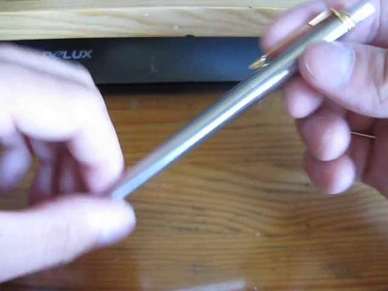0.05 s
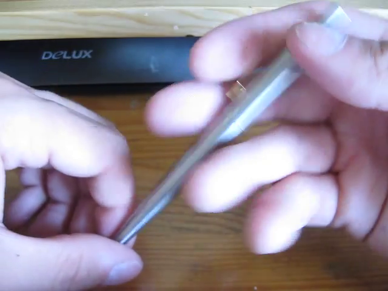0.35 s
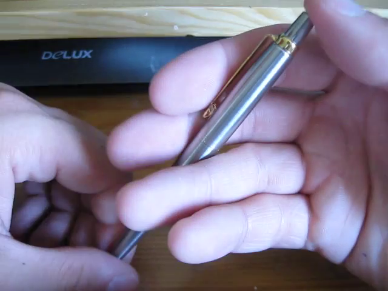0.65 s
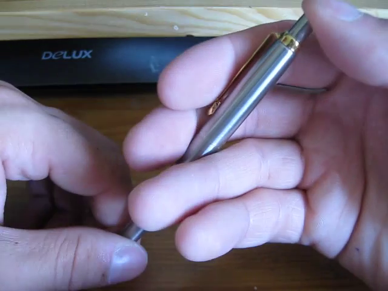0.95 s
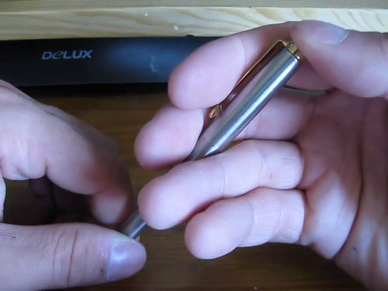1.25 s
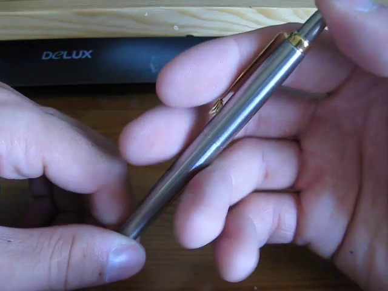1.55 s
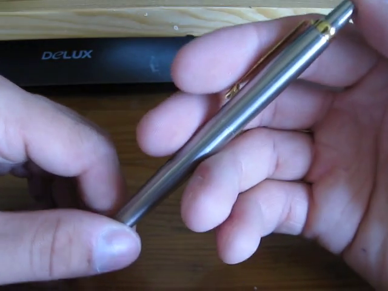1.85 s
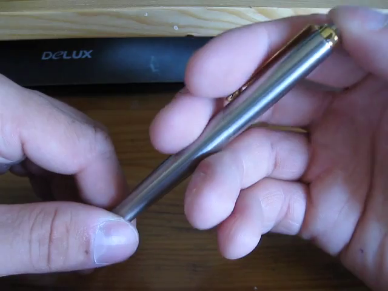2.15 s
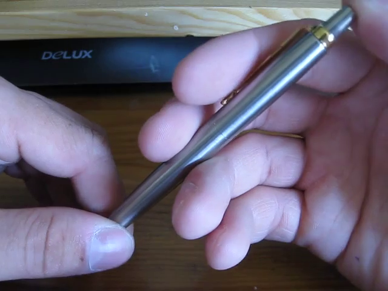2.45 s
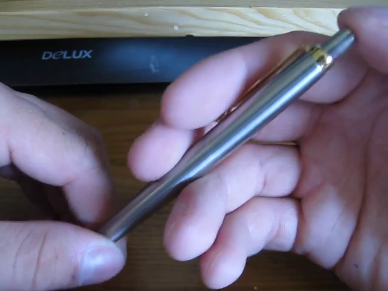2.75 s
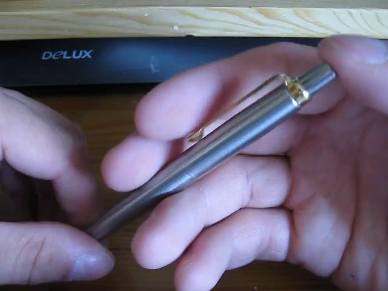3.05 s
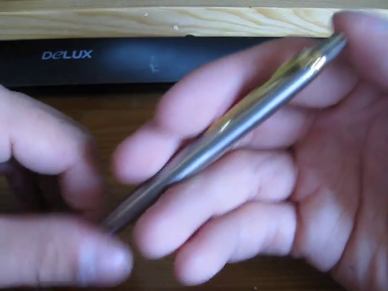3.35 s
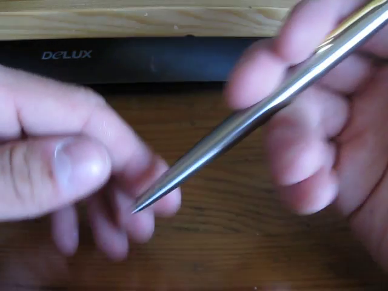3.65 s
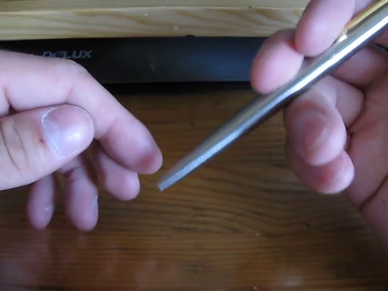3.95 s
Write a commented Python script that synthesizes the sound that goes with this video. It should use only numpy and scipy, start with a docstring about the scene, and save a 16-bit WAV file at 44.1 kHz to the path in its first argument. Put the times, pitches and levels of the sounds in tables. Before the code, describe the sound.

A steel retractable pen clicks close by, pressed at about 1.2 seconds and released at 1.4, then pressed again, louder, at 2.2 and released at 2.4. Faint plunger ticks surround the snaps. Fingers rub the barrel softly near 2.9 seconds, and a hollow palm scuff follows at 3.4. A computer fan hums with a grainy hiss throughout, dipping after each click and swelling back.

```python
"""A computer fan hums over a steady hiss. In front of it, close to a small microphone on a desk,
a steel retractable pen is clicked twice, press and release: each snap is a rush of tiny contacts
as the cam slips, with a short ring from the barrel. The plunger scrapes faintly and the barrel
slides through the fingers. Each click makes the gain control duck the fan, which then swells back."""
import sys
import numpy as np
from scipy import signal
from scipy.fft import rfft, irfft
from scipy.io import wavfile
from scipy.ndimage import uniform_filter1d

SR = 44100
rng = np.random.default_rng(int(sys.argv[2]) if len(sys.argv) > 2 else 0)


def file_out(sig):
    """Save sig as 16-bit WAV at sys.argv[1]."""
    # one column per channel
    cols = np.atleast_2d(sig).T
    # limit, then scale
    lim = np.clip(cols, -1, 1)
    pcm = np.round(lim * 32767).astype(np.int16)
    wavfile.write(sys.argv[1], SR, pcm)


N = 176400
TIME = np.arange(N) / SR

# colour of the air through the fan: f/Hz, level/dB
FAN_AIR_COLOUR = [(25, -13), (60, -3), (88, -14.5), (130, -7.5), (210, -5), (300, -1), (370, -2), (425, -6),
                  (520, -0.5), (630, -2.5), (790, 1), (950, -5.5), (1180, -13), (1380, -9.5), (1750, -15),
                  (2800, -19.5), (4400, -24.5), (6500, -24.5)]
# resonances of the computer case: f/Hz, rms level/dB, half-width/Hz
CASE_RESONANCES = [(60.15, -58.5, 6.4), (168, -56, 10), (245.8, -50, 7), (293.5, -46.5, 7),
                   (350.4, -52, 11), (523.5, -55, 12), (761.2, -51, 7.3), (4244, -68.5, 14)]
# steady hum of motor and blades: f/Hz, rms level/dB
MOTOR_TONES = [(120, -57), (242.5, -53), (301.5, -52), (344.5, -47), (689, -49.5), (1254, -67),
               (4225, -67.5)]
# skin sliding on the barrel: t/s, level/dB, half-length/s
FINGER_RUBS = [(0.755, -48, 0.015), (1.947, -43, 0.031), (2.907, -38, 0.031), (3.380, -35.5, 0.036),
               (3.476, -42, .03)]
# colours of the finger rub and of the hollow palm scuff: f/Hz, level/dB
FINGER_COLOUR = [(600, -7.5), (1500, -14), (2400, -2.5), (3300, -1.5), (4500, -2.5), (5600, -1.5),
                 (7000, -6)]
PALM_COLOUR = [(150, -26.5), (350, -23), (530, 2), (750, -7.5), (1000, -11), (1400, -21), (2200, -31),
               (6000, -41)]
# small ticks of plunger and clip: t/s, level/dB, half-length/s, centre f/Hz, sharpness Q
PLUNGER_TICKS = [(1.062, -43.5, 0.0019, 4730, 2.5), (1.073, -37.5, 0.0027, 4800, 2),
                 (1.126, -37, 0.0012, 4030, 1), (1.324, -34.5, 0.0037, 3780, 1),
                 (1.993, -36, 0.0019, 4300, 1.5), (2.316, -45, 0.0024, 4700, 2),
                 (3.556, -35, 0.0007, 5240, 6)]
# the button pressed home, and springing back: t/s, level/dB, build-up/s, decay/s, steel edge/dB
PRESS_SNAPS = [(1.1892, -10.5, 0.0013, 0.00098, -8), (2.1670, -1, 0.0012, 0.0014, 0)]
RELEASE_SNAPS = [(1.3772, -5, 0.00076, 0.0019, 4), (2.3752, -7.5, 0.0012, 0.0037, -3)]
# colour of each kind of snap: f/Hz, level/dB
PRESS_SNAP_COLOUR = [(150, -9.5), (400, -10.5), (750, 2), (1400, -8), (2400, -1.5), (3300, 0.5), (4400, 1),
                     (5400, -4), (6500, -8), (10000, -5)]
RELEASE_SNAP_COLOUR = [(150, -2.5), (400, -12), (800, -3), (1500, -13.5), (2300, -2.5), (3150, 2.5),
                       (4100, -5.5), (5200, -1), (6500, 0), (10000, -6)]
# modes of the barrel, damped by the hand: f/Hz, gain/dB, t60/s
BARREL_MODES = [(2450, -51, 0.013), (3200, -42, .012), (3550, -44, 0.036), (4750, -42, 0.034),
                (5520, -37.5, 0.011)]
# colour of the hiss: f/Hz, level/dB
HISS_TILT = [(50, 2.4), (1000, 1.8), (3000, -0.91), (7000, -1.5)]
# treble loss of the recorder: f/Hz, gain/dB
TREBLE_LOSS = [(4300, -0.5), (5000, -2.5), (5700, -8), (6300, -19.5), (6900, -27), (7500, -43)]


def from_db(db):
    """Decibels to gain."""
    return 10 ** (np.asarray(db) / 20)


def unit_rms(x):
    """Scale to unit rms."""
    return x / np.sqrt(np.mean(x ** 2) + 1e-20)


def equalise(x, curve):
    """EQ along a curve of f/Hz, gain/dB points."""
    hz, db = np.transpose(curve)
    bins = np.maximum(np.fft.rfftfreq(N, 1 / SR), 1)
    gain_db = np.interp(np.log(bins), np.log(hz), db)
    return irfft(rfft(x) * from_db(gain_db), N)


def noise(colour):
    """Coloured noise of unit rms."""
    return unit_rms(equalise(rng.standard_normal(N), colour))


def swell(peak_s, half_s):
    """A bell-shaped fade in and out."""
    return np.exp(-.5 * ((TIME - peak_s) / half_s) ** 2)


def fan(air_db=-38):
    """The bed: rushing air, the narrow case resonances it stirs, and the hum of motor and blades."""
    bins = np.fft.rfftfreq(N, 1 / SR)
    bed = from_db(air_db) * noise(FAN_AIR_COLOUR)
    for hz, db, half_width_hz in CASE_RESONANCES:
        phases = np.exp(2j * np.pi * rng.random(len(bins)))
        band = phases / (1 + ((bins - hz) / half_width_hz) ** 2)
        bed += from_db(db) * unit_rms(irfft(band, N))
    for hz, db in MOTOR_TONES:
        bed += from_db(db) * np.sqrt(2) * np.sin(2 * np.pi * (hz * TIME + rng.random()))
    return bed


def reflections(x, db, t60_s):
    """Nearby surfaces throw the sound back as a diffuse, dying tail."""
    tail = rng.standard_normal(N) * np.exp(-np.log(1000) * np.minimum(TIME / t60_s, 10))
    tail /= np.sqrt(np.sum(tail ** 2))
    return from_db(db) * signal.fftconvolve(x, tail)[:N]


def finger_rubs(grain_db=2.5, grain_hz=300):
    """Skin sticks and slips on the steel in soft, grainy strokes."""
    lowpass = signal.butter(2, grain_hz, fs=SR, output="sos")
    slips = unit_rms(signal.sosfilt(lowpass, rng.standard_normal(N)))
    strokes = sum(from_db(db) * swell(t, half_s) for t, db, half_s in FINGER_RUBS)
    return strokes * unit_rms(noise(FINGER_COLOUR) * from_db(grain_db * slips))


def palm_scuff(db=-27.5):
    """One hollow scuff of the palm as the grip changes."""
    return from_db(db) * swell(peak_s=3.387, half_s=0.022) * noise(PALM_COLOUR)


def plunger_ticks():
    """The plunger and clip catch lightly, each tick a speck of band-passed grit."""
    ticks = np.zeros(N)
    for t, db, half_s, hz, q in PLUNGER_TICKS:
        grit = signal.lfilter(*signal.iirpeak(hz, q, fs=SR), rng.standard_normal(N))
        ticks += from_db(db) * swell(t, half_s) * unit_rms(grit)
    return ticks


def barrel_ring(hits, hz, t60_s):
    """One mode of the steel barrel rings on after each hit."""
    decay = np.exp(-np.log(1000) / (t60_s * SR))
    angle = 2 * np.pi * hz / SR
    return signal.lfilter([0, np.sin(angle)], [1, -2 * decay * np.cos(angle), decay ** 2], hits + 1e-18)


def cam_snaps(snaps, colour, contacts_per_s=7000, edge_from_hz=5200, edge_full_hz=10000):
    """The cam slips with a rush of tiny contacts that builds up to the stop and dies at once."""
    hits = np.zeros(N)
    for t, db, rise_s, decay_s, edge_db in snaps:
        log_envelope = np.minimum((TIME - t) / rise_s, (t - TIME) / decay_s)
        envelope = np.exp(np.maximum(log_envelope, -40))
        contacts = (rng.random(N) < contacts_per_s / SR) * rng.choice([-1, 1], N)
        burst = equalise(envelope * contacts, colour)
        burst = equalise(burst, [(edge_from_hz, 0), (edge_full_hz, edge_db)])  # steel edge: a high shelf
        makeup = np.sqrt(np.sum(envelope ** 2) / np.sum(burst ** 2))
        hits += from_db(db) * makeup * burst
    return hits


def button_clicks():
    """The snaps of press and release set the barrel ringing briefly."""
    hits = cam_snaps(PRESS_SNAPS, PRESS_SNAP_COLOUR) + cam_snaps(RELEASE_SNAPS, RELEASE_SNAP_COLOUR)
    return hits + sum(from_db(db) * barrel_ring(hits, hz, t60_s) for hz, db, t60_s in BARREL_MODES)


def scene():
    """The mono mix: pen and hand over the desk, in front of the fan."""
    pen = button_clicks() + plunger_ticks()
    desk = reflections(pen, db=-7, t60_s=0.023)
    room = reflections(pen, db=-17.5, t60_s=0.093)
    return (pen + desk + room + finger_rubs() + palm_scuff() + fan())[None]


def gain_control(x, threshold_db=-23.5, duck_db_per_db=0.92, sense_s=0.00091, attack_s=0.00058,
                 release_s=0.3):
    """Peaks over the threshold duck the whole mix at once; the gain creeps back."""
    power = uniform_filter1d(x ** 2, int(sense_s * SR))
    level_db = 10 * np.log10(np.abs(power) + 1e-12)
    duck_db = duck_db_per_db * np.maximum(level_db - threshold_db, 1e-6)
    release = TIME / release_s
    held_db = np.exp(np.maximum.accumulate(np.log(duck_db) + release) - release)  # decaying peak hold
    pole = np.exp(-1 / (attack_s * SR))
    return x * from_db(-signal.lfilter([1 - pole], [1, -pole], held_db))


def converter(x, rate_hz=16000, step_db=-42.5):
    """A slow, coarse converter: its steps make quiet moments grainy."""
    steps = signal.resample(x, N * rate_hz // SR) / from_db(step_db)
    crushed = np.round(steps + .5) - .5
    return signal.resample(crushed, N) * from_db(step_db)


def record(dry, hiss_db=-53, cutoff_hz=7800, dc_offset=-.0177):
    """The chain: gain control, hiss, a coarse converter, a dulled top end and a DC offset."""
    ducked = gain_control(dry[0])
    grainy = converter(ducked + from_db(hiss_db) * noise(HISS_TILT))
    dulled = equalise(grainy, TREBLE_LOSS)
    high_cut = signal.cheby2(12, 60, cutoff_hz, fs=SR, output="sos")
    return signal.sosfilt(high_cut, dulled)[None] + dc_offset


dry = scene()
out = record(dry)
file_out(out)
```